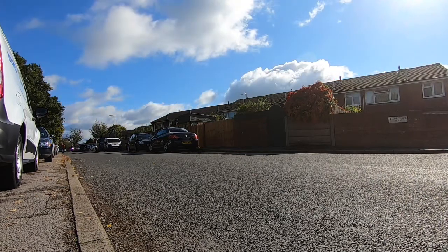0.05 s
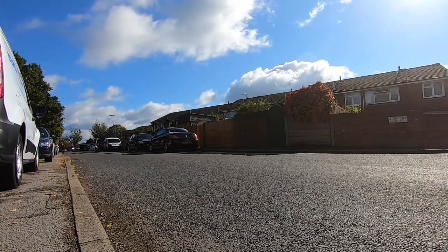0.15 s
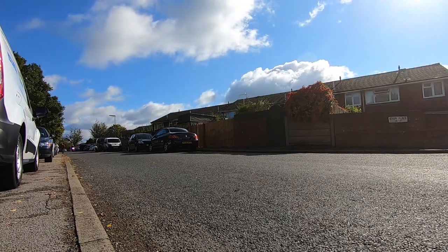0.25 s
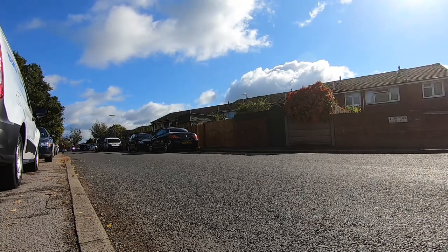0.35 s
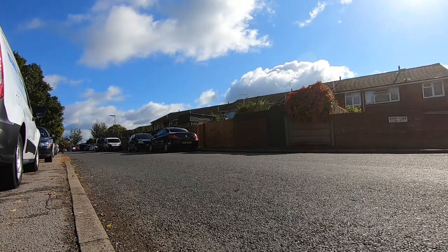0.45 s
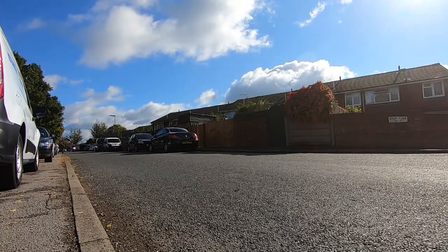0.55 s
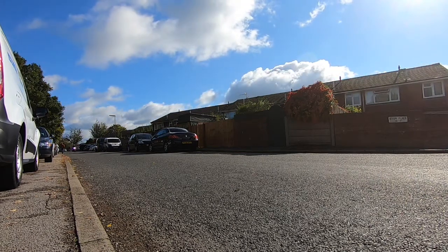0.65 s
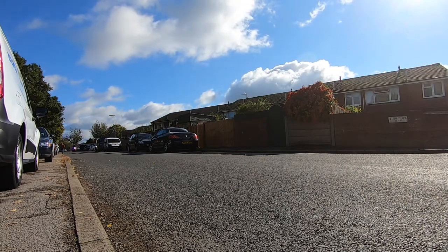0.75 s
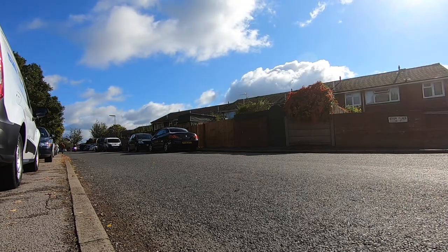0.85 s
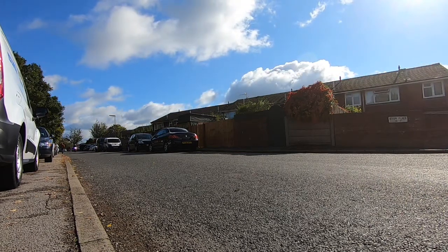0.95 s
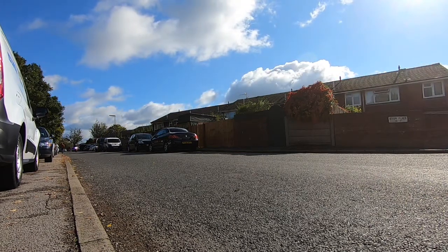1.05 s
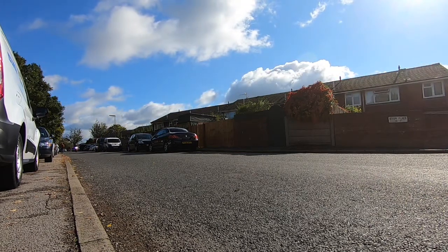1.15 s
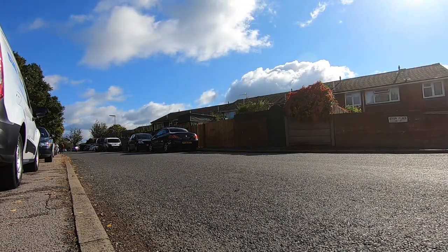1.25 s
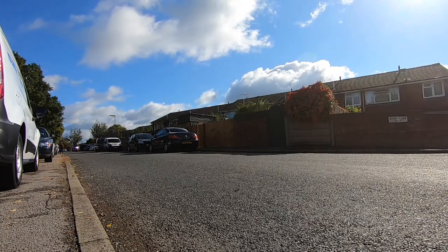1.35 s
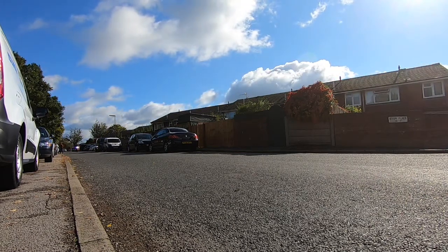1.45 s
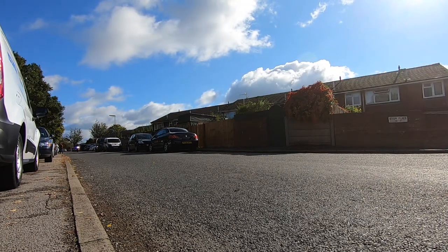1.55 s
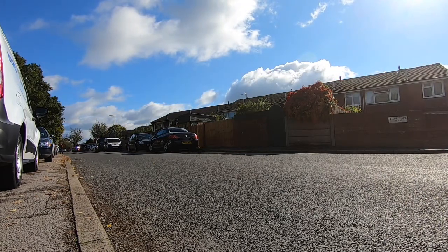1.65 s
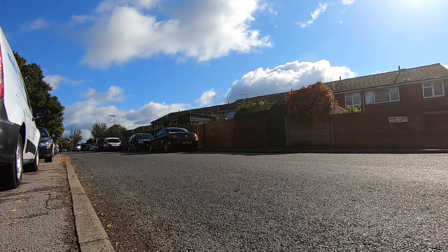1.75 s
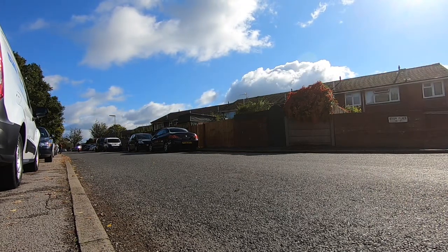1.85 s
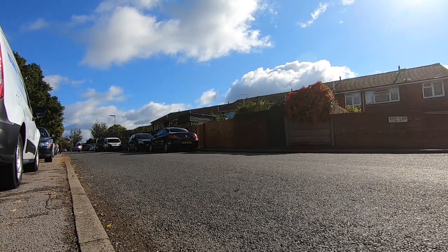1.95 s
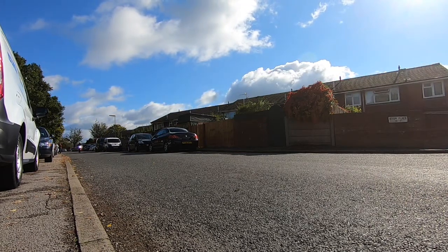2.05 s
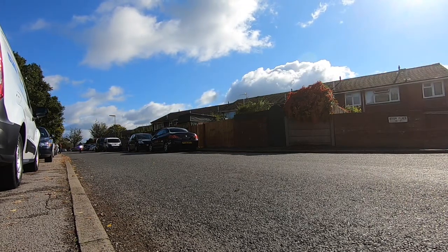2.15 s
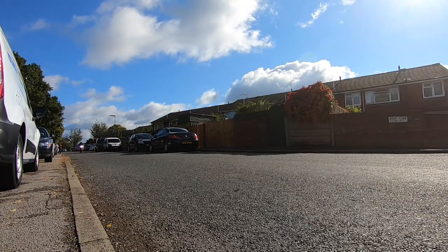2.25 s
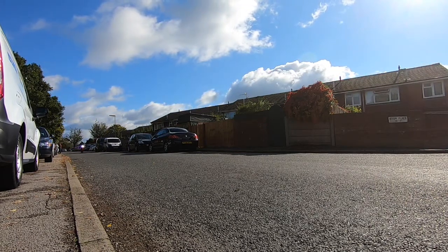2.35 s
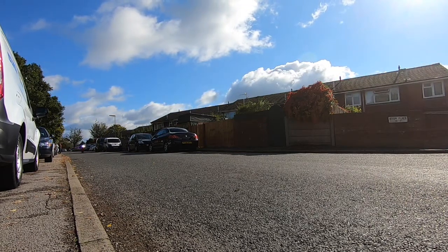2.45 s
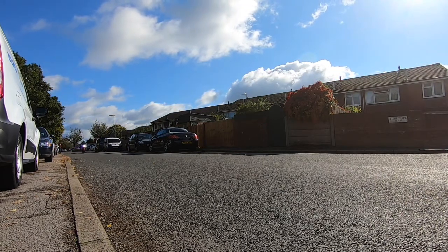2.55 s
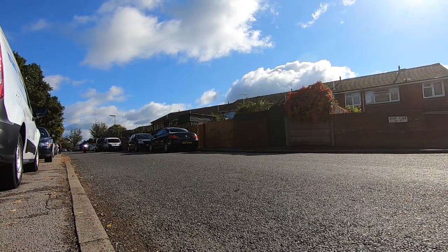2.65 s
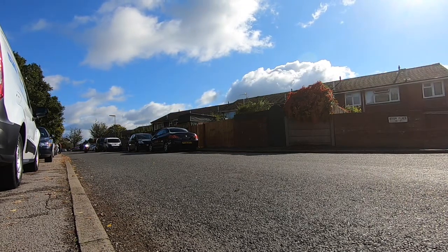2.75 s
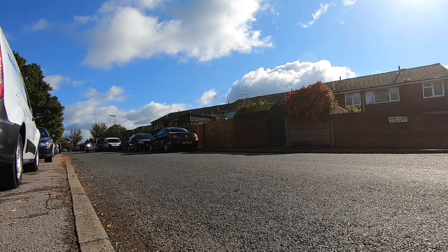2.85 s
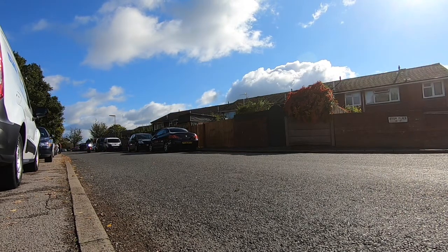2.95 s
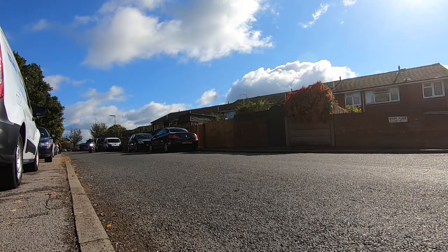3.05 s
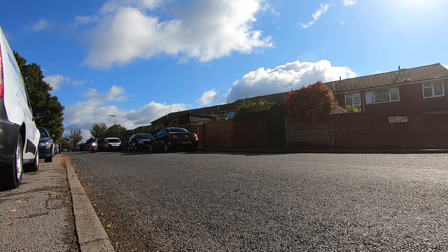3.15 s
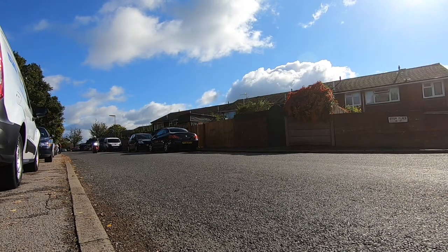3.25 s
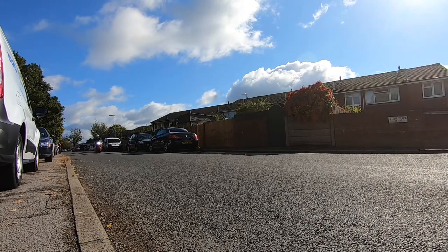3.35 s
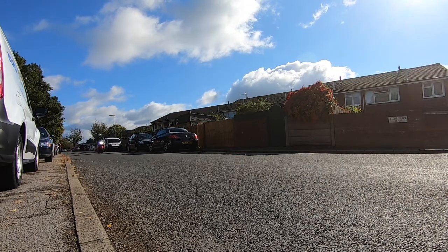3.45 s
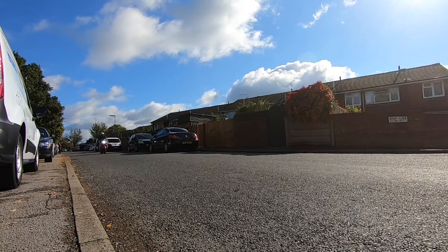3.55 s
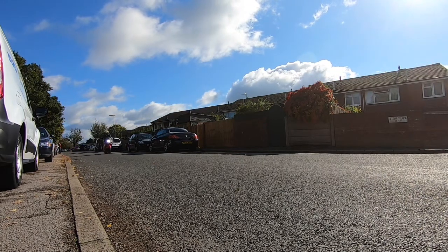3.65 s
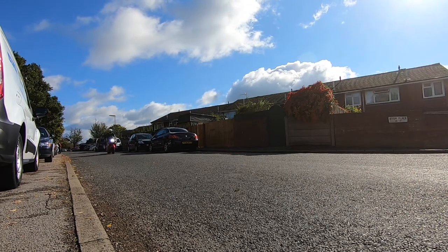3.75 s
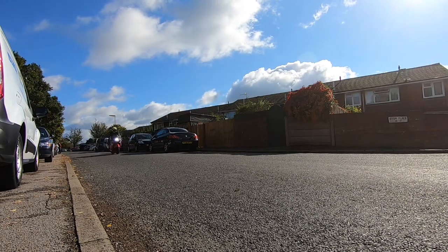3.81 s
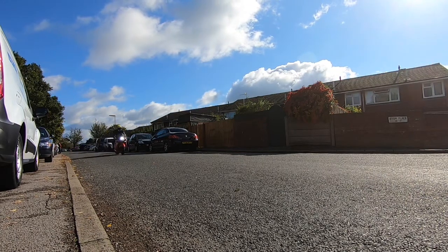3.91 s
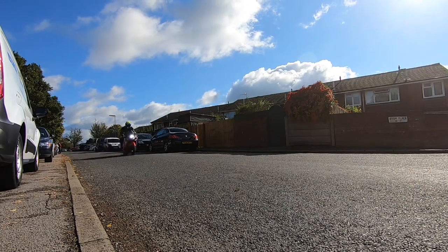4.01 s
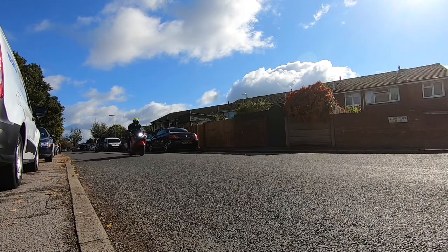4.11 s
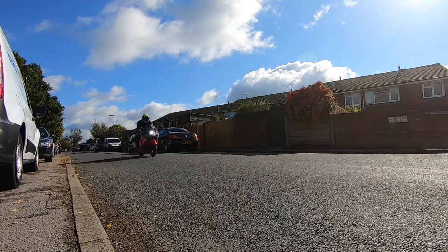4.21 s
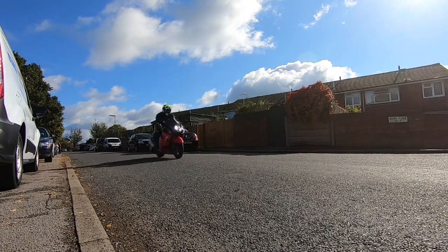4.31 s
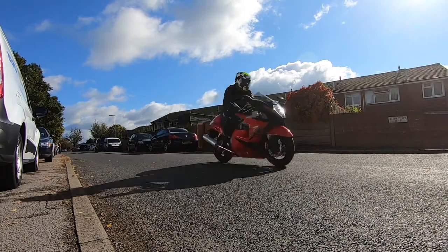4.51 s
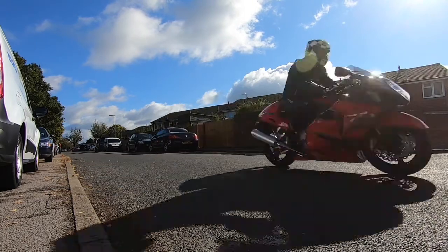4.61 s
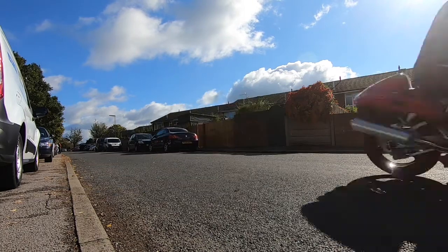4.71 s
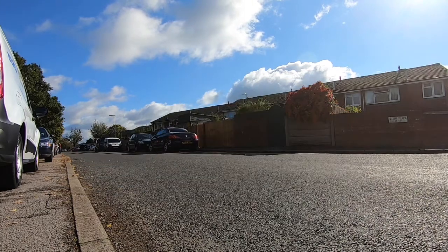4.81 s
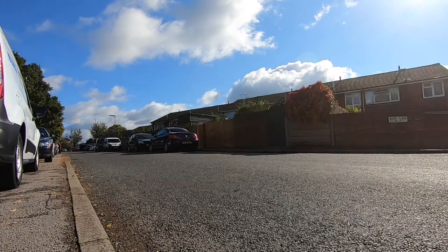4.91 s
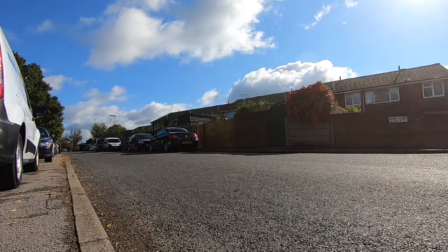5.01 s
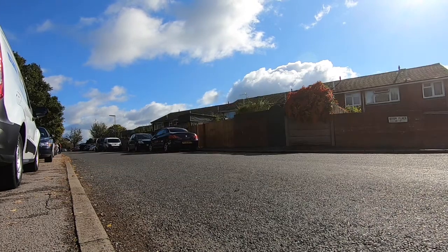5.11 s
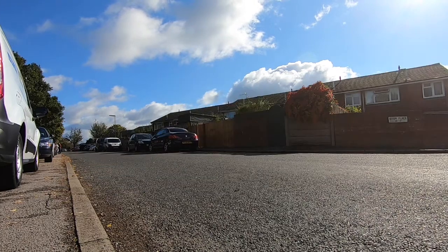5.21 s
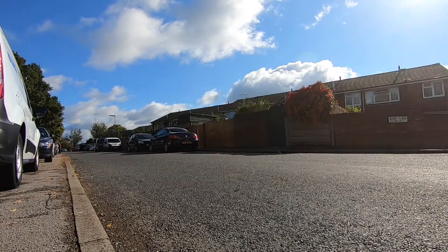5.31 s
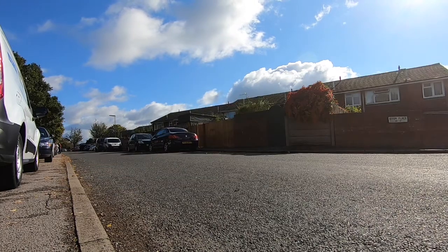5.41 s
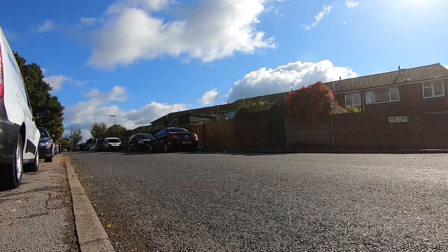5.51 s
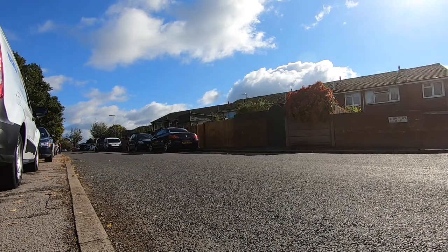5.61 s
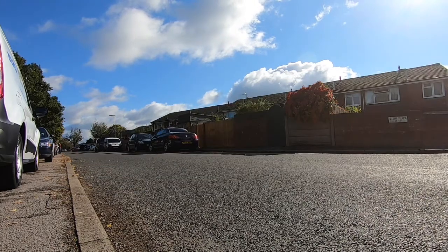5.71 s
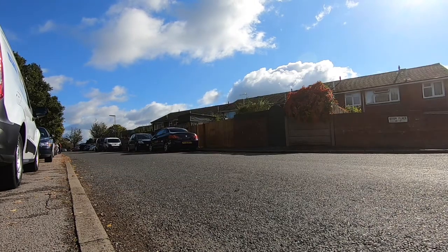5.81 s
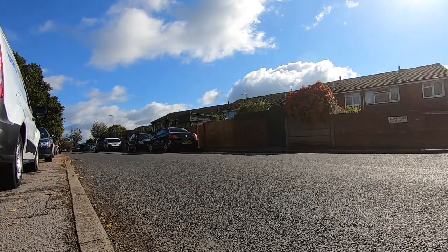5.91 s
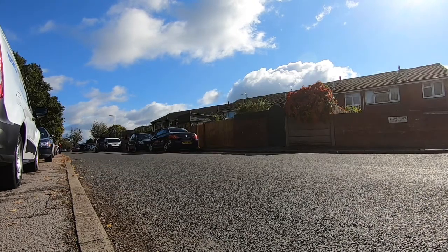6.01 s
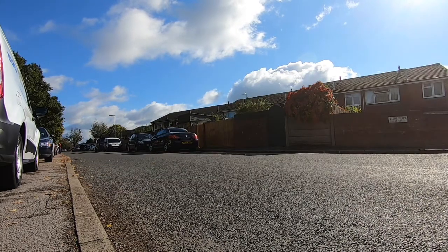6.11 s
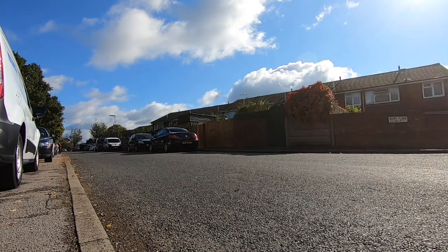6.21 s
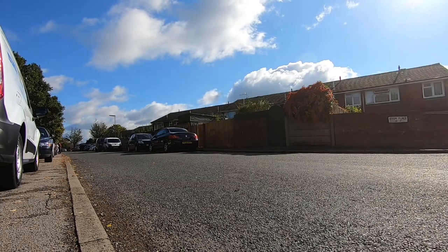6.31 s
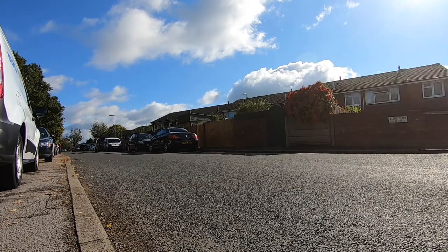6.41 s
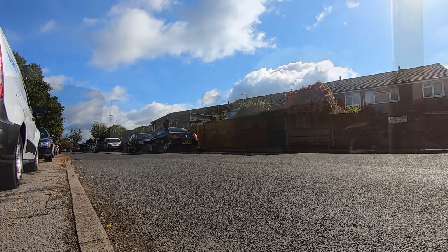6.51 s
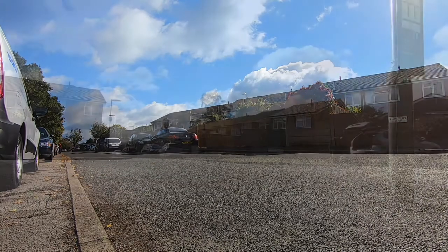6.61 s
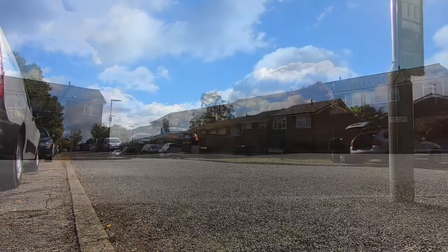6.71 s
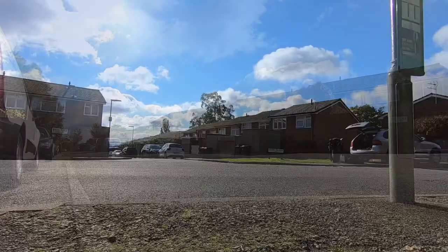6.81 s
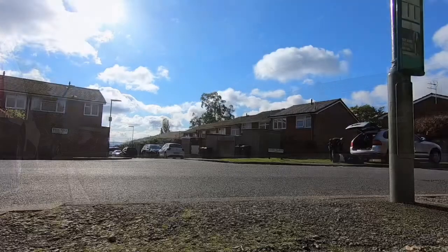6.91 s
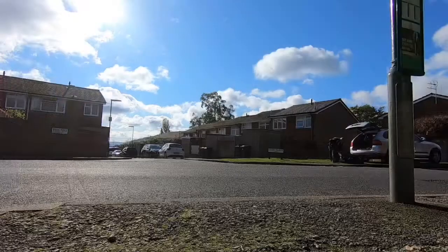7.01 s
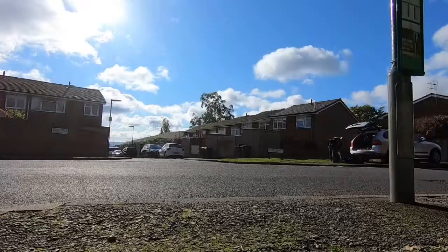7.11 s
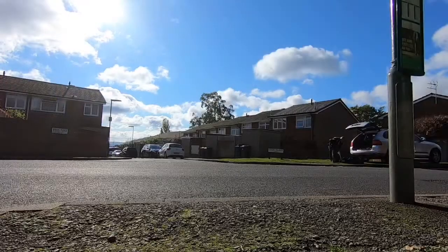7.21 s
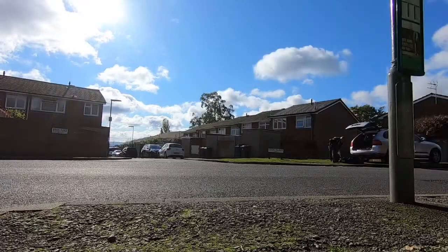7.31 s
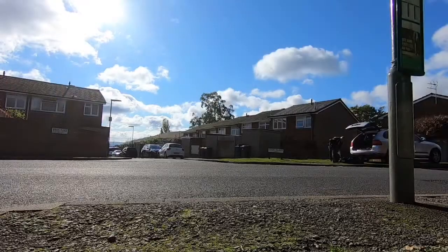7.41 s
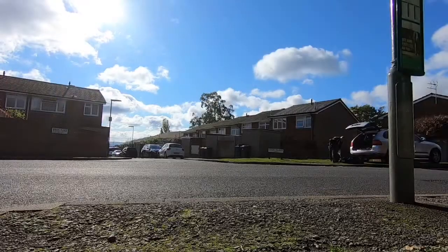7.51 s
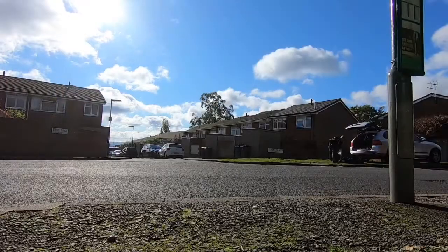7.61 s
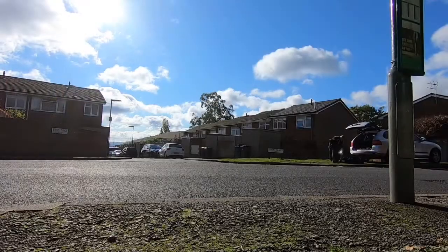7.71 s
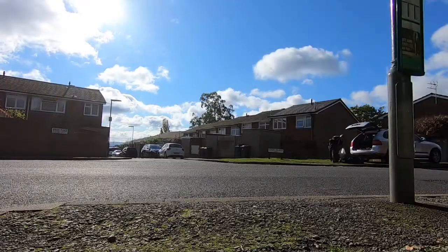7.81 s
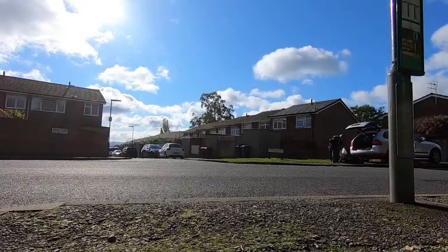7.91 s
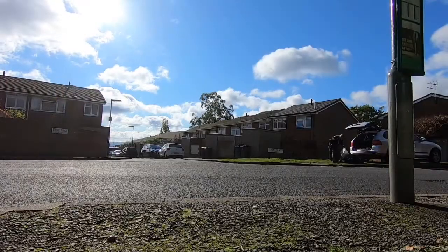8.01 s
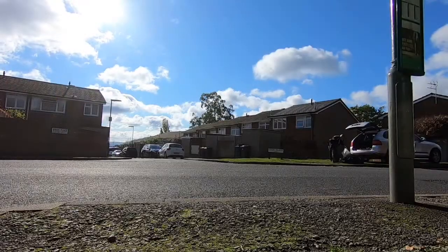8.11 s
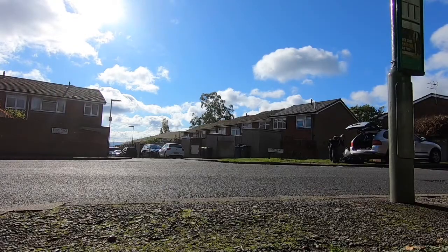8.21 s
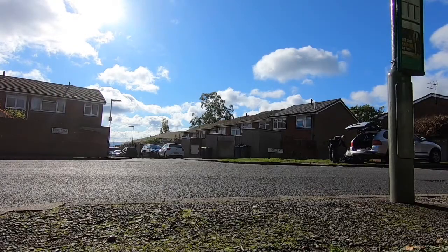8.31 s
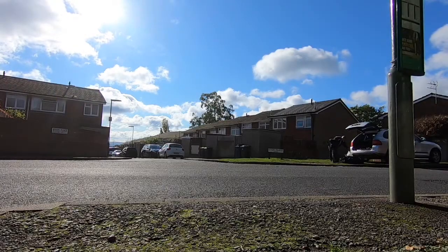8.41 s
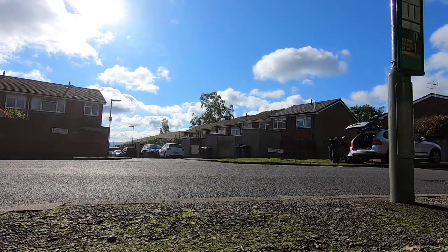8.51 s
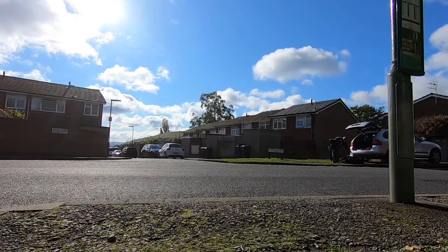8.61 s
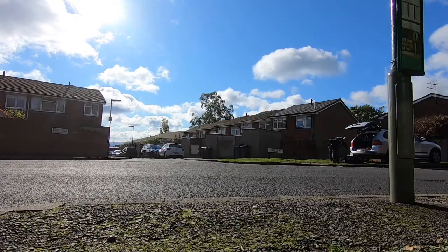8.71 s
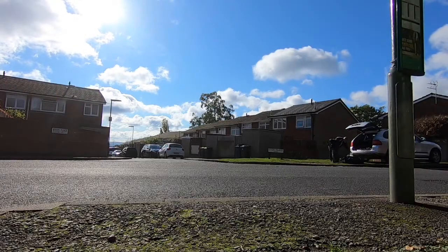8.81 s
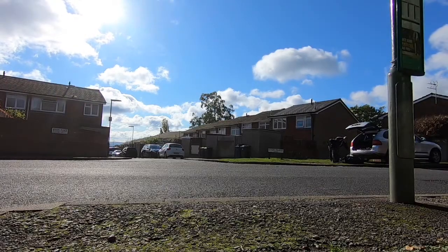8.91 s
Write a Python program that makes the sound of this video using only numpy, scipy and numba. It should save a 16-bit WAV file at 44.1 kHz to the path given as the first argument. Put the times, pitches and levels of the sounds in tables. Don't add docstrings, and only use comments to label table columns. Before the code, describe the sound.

Low roadside stereo microphone outdoors, gusts rumbling on it. A distant motorcycle accelerates for over four seconds, engine note climbing, with whine and gritty roar growing steadily. It passes abruptly close, left to right; the throttle closes, whine vanishes, and the exhaust stutters and sinks in pitch as it leaves. The sound then dissolves into the same machine idling slowly, deep, uneven pulses growing gradually louder toward the right.

```python
import sys
import numpy as np
from scipy import signal
from scipy.fft import irfft
from scipy.io import wavfile
from scipy.ndimage import uniform_filter1d, map_coordinates
from numba import njit

SR = 44100
rng = np.random.default_rng(int(sys.argv[2]) if len(sys.argv) > 2 else 0)


def persist_wave(psi):
    counts = np.round(np.clip(psi, -1, 1) * 32767).astype(np.int16)
    wavfile.write(sys.argv[1], SR, np.atleast_2d(counts).T)


def convert_level_to_amplitude(level_db):
    exponent = np.asarray(level_db, float) / 20
    return 10 ** exponent


N = 394694
TIME = np.arange(N) / SR
FADE_S = 6.77, 6.95

# (time [s], firing rate [Hz])
FIRING_RATE = [(0, 95.5), (1, 102.5), (1.86, 111), (2.5, 119), (3.17, 128.2), (4.2, 142), (4.35, 143.5),
               (4.55, 144), (4.65, 142), (4.74, 134), (4.82, 130), (5.2, 126.5), (5.65, 118), (6, 111.5),
               (6.35, 107), (7, 95)]
# (time [s], level below the closest point [dB])
NEARNESS = [(0, -30), (.72, -26.5), (1.2, -24), (1.74, -19.5), (2.34, -17), (2.9, -13), (3.42, -10),
            (3.75, -6.5), (4.21, -2.5), (4.47, 0.9), (4.69, 0.5), (4.93, -2.5), (5.33, -9), (6, -14.5),
            (6.5, -16), (6.75, -23.5)]
# (time [s], pitch factor [ratio], lead of the left [samples], left minus right [dB])
COURSE = [
    (0, 1.086, 0.46, 3.5),
    (3, 1.08, -0.54, 3.5),
    (4.3, 0.98, 0.39, 0.3),
    (4.55, 1, -0.011, -2),
    (4.72, 1, -1.3, -11),
    (5.1, 0.95, -1.6, -6),
    (6.4, 0.942, -1.3, -9),
    (6.9, .96, -1.3, -5),
    (8.95, 1, -0.77, -8),
]
# (time [s], level [dB])
EXHAUST_BEAT = [(0, -39.5), (1, -35.5), (1.4, -37.5), (1.65, -32), (2.2, -27.5), (2.8, -23), (3.2, -20),
                (3.8, -19), (4.2, -15), (4.6, -14.5), (4.8, -18.5), (5.2, -14.5), (5.5, -24.5), (6, -23),
                (6.3, -25), (6.5, -36.5), (6.8, -33.5), (7, -43)]
# (time [s], depth [dB], half width [s])
BEAT_NULLS = [(.2, 0.5, 0.098), (.8, -12, 0.069), (1.23, -11, 0.12), (1.92, -9, 0.14), (2.4, -10, 0.097),
              (2.6, -5.5, 0.11), (2.88, -6.5, 0.067), (3.08, -4, 0.053), (3.48, -17, 0.037),
              (3.58, -11, 0.038), (3.68, -11, 0.028), (3.95, -5, 0.043), (4.08, -7.5, 0.064),
              (4.3, -11, 0.046), (4.43, -13, 0.042), (4.53, -6.5, 0.03), (4.69, -7.5, 0.052),
              (5.58, -5, 0.041), (6.19, -17, 0.058)]
# (time [s], depth [dB], half width [s])
OCTAVE_NULLS = [(.17, -17, 0.078), (.7, -1, .1), (1.2, 2.5, 0.33), (2.2, -15, 0.23), (2.55, -3, .15),
                (3.0, -4, 0.19), (3.27, -14, .1), (3.62, -12, 0.18), (4.15, -3.5, .1), (5.1, -5.5, 0.079),
                (5.3, -9, 0.073), (6.2, -4.5, 0.068), (6.75, -14, 0.13)]
# (time [s], depth [dB], half width [s])
WHINE_NULLS = [
    (.05, -9, .1),
    (.4, 3.5, 0.2),
    (1.2, -6.5, 0.33),
    (1.7, -1, 0.081),
    (2.5, -5, 0.64),
    (3.25, -4, 0.15),
    (3.6, -4, .06),
    (3.95, -3.5, 0.2),
    (4.8, -14, 0.051),
]
# (time [s], that firing [dB], the next firing
# [dB])
MISFIRES = [(4.657, -6, -6), (4.674, -16, -5), (4.697, 9, 8), (4.726, -20, 10.5), (4.762, -23, 1.5),
            (4.778, -11, -3), (4.792, 8, 3), (4.809, -28, 7.5), (4.84, -16, 4), (4.864, -1, 4),
            (4.896, -2, 4), (4.934, -3, 5.5), (4.996, -34, 1), (5.216, -13, -1), (5.232, -4, -3),
            (6.214, -12, -7), (6.285, -18, -12), (6.316, -4, 5.5), (6.404, -19, -15)]
# (multiple of firing rate [ratio], level over the roar [dB], from [s], until [s])
CASING_ORDERS = [(.5, -13, 3.5, 6), (1.5, -4, 1.5, 2.6), (1.5, -9, 3, 4.4), (2.5, -7, 1.8, 4.7),
                 (2.75, -6, 6, 6.9), (3, -6, 0, 3.4), (3, -11, 3.6, 4.6), (3, -6, 4.8, 6),
                 (3.5, -12, 2.2, 3.2), (4, -14, 3.8, 4.7), (4.5, -13, 2.5, 5.6), (5, -8, 1.8, 3.4),
                 (5, -12, 3.6, 4.2), (5, -4, 4.3, 4.5), (5.5, -7, 4.25, 4.6), (6, -10, 4.42, 4.55),
                 (8.25, -5, 0, .25), (11, -8, 1.1, 2.2), (10, -13, 2.6, 3.2)]
# (multiple of firing rate [ratio], level over the whine [dB], from [s], until [s])
WHINE_SIDES = [
    (25, -3, 0, 1.1),
    (27, 0, 4.28, 4.6),
    (25.8, -1, 4.58, 4.68),
    (28, -10, 3.2, 4.1),
]
# (low edge [Hz], high edge [Hz])
ROAR_BANDS = [
    (160, 400),
    (400, 1500),
    (1500, 4500),
    (5000, 11000),
]
# (closest [dB], slope [dB per dB of nearness], gain from behind [dB], idle far [dB], idle near [dB])
LAYERS = [
    (-32.5, 0.88, -2.5, -52.5, -42.5),
    (-28, 0.9776, -0.5, -48, -44.5),
    (-27, 1.0656, -5, -55.5, -52.5),
    (-44, 1.34, 2.5, -75.5, -65.5),
]
# (time [s], gain [dB], half width [s])
CLATTER_SWELLS = [(.9, -0.5, 0.34), (2.55, 3.5, 0.43), (4.47, 2, 0.17), (6.12, 3.5, 0.093), (7.15, 2, .35),
                  (8.9, 2.5, 0.25)]
# (frequency [Hz], density [dB per Hz])
PASS_COLOUR = [(40, -24.5), (70, -5), (130, -4), (240, -8), (470, -14), (600, -12), (870, -17.5),
               (2400, -28.5), (3900, -42.5), (5600, -55), (8000, -67.5), (11000, -77.5), (14500, -85.5)]
# (frequency [Hz], density [dB per Hz])
IDLE_COLOUR = [(40, 9), (130, -1.5), (220, -12), (840, -21), (990, -24.5), (1300, -28), (2300, -35),
               (4500, -46.5), (9800, -52.5), (14500, -62)]
# (frequency [Hz], side minus mid [dB])
DIFFUSE = [(60, -15.5), (130, -37), (280, -50), (620, -10), (1200, -2.5), (2500, -11), (4200, -13.5),
           (7500, 4), (13000, -4)]
# (frequency [Hz], width [Hz], level over its roar band [dB], from [s], until
# [s])
HOLLOW_PARTS = [(606, 120, -3, 2.48, 4.45), (1165, 110, -5.5, 2.44, 4.3), (280, 75, 5.5, 4.79, 4.87),
                (600, 42, -4, 4.85, 6.45), (1180, 42, -7.5, 4.9, 6), (1010, 35, -9, 7.2, 9),
                (340, 25, -9, 7.3, 8.6), (2320, 160, -12, 2.7, 2.4), (5050, 300, 0, .3, 2.8),
                (7800, 900, -8.5, 4.5, 8.3), (10080, 1200, -9.5, 4.09, 11), (13600, 1900, -20, 4.2, 8.2)]
# (time [s], peak [dB], half width [s])
GUSTS = [(0, -34.5, 0.17), (.42, -37, 0.21), (.82, -36, .13), (1.35, -40, 0.091), (1.8, -42, 0.074),
         (2.2, -47, 0.17), (3.68, -45, .12), (5.4, -49, .2), (6.05, -40, .08), (6.28, -29.5, 0.14),
         (6.6, -32.5, 0.087), (7.38, -43, .08), (7.75, -47, 0.12), (8.1, -48, 0.069), (8.42, -35, .1),
         (8.9, -44, 0.068)]
# (first [s], last [s], first level [dB], last level [dB], stumble change [dB])
IDLE_RUNS = [(6.71, 6.81, -26, -29, -6), (6.846, 6.97, -22, -22, -4), (7.047, 7.306, -24, -22, -8),
             (7.365, 7.518, -20, -21, -5), (7.576, 7.627, -19, -18.5, -10), (7.677, 7.726, -17, -18.5, -8),
             (7.784, 7.921, -19, -16.5, -6), (8.003, 8.056, -16, -18, -10), (8.111, 8.16, -19, -17, -7),
             (8.22, 8.351, -16, -17, -5), (8.402, 8.455, -15.5, -15.5, -13), (8.545, 8.679, -17, -15.5, -8),
             (8.762, 8.891, -15.5, -13.5, -9)]
# (frequency [Hz], width [Hz], level [dB])
SILENCER = [
    (77.4, 33, 3.5),
    (37.4, 28, -1.5),
    (117, 100, -23),
    (171, 35, -7),
]


def curves(table):
    s, *columns = np.transpose(table)
    return [np.interp(TIME, s, c) for c in columns]


def bumps(rows):
    return sum(height * np.exp(-((TIME - s) / width) ** 2) for s, height, width in rows)


def window(start, stop, edge=.12):
    return np.clip(np.minimum(TIME - start, stop - TIME) / edge + 1, 0, 1)


def walk(rate):
    hold = int(SR / rate)
    steps = np.repeat(rng.standard_normal(N // hold + 1), hold)
    return 1.3 * uniform_filter1d(uniform_filter1d(steps, hold), hold)[:N]


def unit(x):
    return x / np.sqrt(np.mean(x ** 2))


def colour_db(table, hz):
    table_hz, db = np.transpose(table)
    return np.interp(np.log(hz), np.log(table_hz), db)


@njit
def svf(x, hz, width):
    y, b, l = np.empty(len(x)), 0., 0.
    for i in range(len(x)):
        g, k = np.tan(np.pi * hz[i] / SR), width / hz[i]
        v = (b + g * (x[i] - l)) / (1 + g * (g + k))
        b, l, y[i] = 2 * v - b, l + 2 * g * v, k * v
    return y


def resonate(x, hz, width):
    return svf(svf(x, hz, width), hz, width)


def by_distance(db, slope, behind_db):
    return db + slope * curves(NEARNESS)[0] + behind_db * np.interp(TIME, (4.61, 4.85), (0, 1))


def passing_engine(cycles, roar_db):
    flutter_db = -0.1 * curves(NEARNESS)[0] * walk(11)
    beat_db = curves(EXHAUST_BEAT)[0] + bumps(BEAT_NULLS) + flutter_db
    octave_db = by_distance(-28.5, 0.61, 0.43) + bumps(OCTAVE_NULLS)
    whine_db = by_distance(-36.5, 1, -14) + bumps(WHINE_NULLS)

    size_db = 0.15 * rng.standard_normal(int(cycles[-1]) + 2)
    for s, weak_db, next_db in MISFIRES:
        k = int(cycles[int(s * SR)])
        size_db[k:k + 2] += weak_db, next_db
    size = convert_level_to_amplitude(size_db)[cycles.astype(int)]
    angle = 2 * np.pi * cycles
    no_flow = signal.butter(2, 72., "high", fs=SR, output="sos")
    puffs = signal.sosfilt(no_flow, size * (1 - np.cos(angle)))
    out = convert_level_to_amplitude(beat_db) * puffs
    out += convert_level_to_amplitude(octave_db - 3.5) * np.sin(2 * angle + 0.17 * walk(18))

    for multiple, db, start, stop in CASING_ORDERS:
        level = window(start, stop) * convert_level_to_amplitude(roar_db + db + 3 * walk(14))
        out += level * np.sin(multiple * angle + 1.2 * walk(14))
    for multiple, db, start, stop in [(25.9, 0.0091, 0.0099, 5.4), *WHINE_SIDES]:
        level = window(start, stop, edge=.06) * convert_level_to_amplitude(whine_db + db - 1 + 3 * walk(30))
        out += level * np.sin(multiple * angle + 1.6 * walk(25))
    mesh_hz = 26.15 * np.gradient(cycles) * SR
    mesh_noise = unit(resonate(rng.standard_normal(N), mesh_hz, 420.))
    out += window(0, 4.66, edge=.1) * convert_level_to_amplitude(uniform_filter1d(whine_db, SR // 4) - 1) * mesh_noise
    return np.sqrt(2) * out * np.interp(TIME, FADE_S, (1, 0)) ** 0.27


def layer_levels():
    later = np.interp(TIME, (FADE_S[0] - .1, FADE_S[1]), (0, 1))
    dbs = [by_distance(*row[:3]) for row in LAYERS]
    dbs[0] = 10 * np.log10(convert_level_to_amplitude(2 * dbs[0]) + convert_level_to_amplitude(2 * -45.5))
    dbs[1] = dbs[1] + 3 * window(6.3, 6.45)
    for k, row in enumerate(LAYERS):
        idle_db = np.interp(TIME, (FADE_S[1], TIME[-1]), row[3:])
        dbs[k] = dbs[k] + later * (idle_db - dbs[k])
    dbs[2] = dbs[2] + bumps(CLATTER_SWELLS)
    return dbs


def noise_band(hz):
    bins = np.zeros(N // 2 + 1, complex)
    a, b = int(hz * 2 ** (-1 / 3) * N / SR), int(hz * 2 ** (1 / 3) * N / SR)
    noise = rng.standard_normal(b - a) + 1j * rng.standard_normal(b - a)
    bins[a:b] = noise * np.sin(np.linspace(0, np.pi, b - a))
    return unit(irfft(bins, N))


def roar(band_dbs, throb, doppler):
    centres = 45 * 2 ** np.arange(0, 8.4, 1 / 3)
    middles = np.log([np.sqrt(lo * hi) for lo, hi in ROAR_BANDS])
    shape = []
    for colour in (PASS_COLOUR, IDLE_COLOUR):
        db = colour_db(colour, centres) + 10 * np.log10(centres)
        sums = []
        for lo, hi in ROAR_BANDS:
            inside = (centres > lo) & (centres < hi)
            sums.append(10 * np.log10(np.sum(convert_level_to_amplitude(2 * db[inside]))))
        shape.append((db, sums))

    later = np.interp(TIME, FADE_S, (0, 1))
    direct, diffuse, swell = 0, 0, walk(2.566)
    for k, hz in enumerate(centres):
        share = [np.interp(np.log(hz), middles, row) for row in np.eye(4)]
        early_db, late_db = (db[k] - np.dot(share, sums) for db, sums in shape)
        level_db = sum(w * c for w, c in zip(share, band_dbs))
        level_db = level_db + early_db + later * (late_db - early_db)
        gain = convert_level_to_amplitude(level_db + .5 * swell + 0.51 * walk(12)) * (1 + min(hz / 4000.0, 1) * throb)
        direct = direct + gain * noise_band(hz)
        diffuse = diffuse + gain * convert_level_to_amplitude(colour_db(DIFFUSE, hz)) * noise_band(hz)
    return direct + hollow_parts(band_dbs, middles, doppler), diffuse


def hollow_parts(band_dbs, middles, doppler):
    out = np.zeros(N)
    for hz, width, db, start, stop in HOLLOW_PARTS:
        band_db = band_dbs[np.argmin(abs(middles - np.log(hz)))]
        ring = unit(resonate(rng.standard_normal(N), hz * doppler, 2. * width))
        level = convert_level_to_amplitude(band_db + db + (1 + 60 / width) * walk(16))
        out += level * window(start, stop, edge=.2) * ring
    return out


def wind():
    sos = signal.butter(2, [18., 75.], "band", fs=SR, output="sos")
    left, right, both, town = (unit(signal.sosfilt(sos, rng.standard_normal(N))) * convert_level_to_amplitude(2.0 * walk(14))
                               for _ in range(4))
    strength = convert_level_to_amplitude(-53.5) + bumps([(s, convert_level_to_amplitude(db), width) for s, db, width in GUSTS])
    return (np.array([left, right]) + 0.32 * both) * strength + convert_level_to_amplitude(-47.5) * town


def idling_engine():
    even_hz, stumble_hz = 38.5, 34
    times, dbs = [], []
    for run, (again, *_) in zip(IDLE_RUNS, [*IDLE_RUNS[1:], (8.97,)]):
        first, last, first_db, last_db, soft_db = run
        even = round((last - first) * even_hz) + 1
        slow = max(round((again - last) * stumble_hz), 2)
        times += list(np.linspace(first, last, even))
        times += list(np.linspace(last, again, slow + 1)[1:-1])
        dbs += list(np.linspace(first_db, last_db, even))
        dbs += [last_db + soft_db] * (slow - 1)

    jitter, unevenness = rng.standard_normal((2, len(times)))
    at = ((np.array(times) - .003 + 0.00057 * jitter) * SR).astype(int)
    pulses = np.zeros(N + SR)
    pulses[at] = convert_level_to_amplitude(np.array(dbs) + 0.85 * unevenness)
    pulses[at + int(.0135 * SR)] = convert_level_to_amplitude(np.array(dbs) - 11.5)
    pulses = uniform_filter1d(pulses[:N], int(0.0047 * SR))
    ring = sum(convert_level_to_amplitude(db) * resonate(pulses, np.full(N, 1. * hz), 2. * width) for hz, width, db in SILENCER)
    throb = unit(uniform_filter1d(pulses, int(0.013 * SR)))
    return convert_level_to_amplitude(48.5) * ring, throb


def scene():
    band_dbs = layer_levels()
    doppler, lead, pan_db = curves(COURSE)
    cycles = np.cumsum(uniform_filter1d(curves(FIRING_RATE)[0], 2500)) / SR
    idle, idle_throb = idling_engine()
    throb = 0.066 * np.cos(2 * np.pi * cycles) * (TIME < FADE_S[1]) + 0.068 * (idle_throb - .3)
    direct, diffuse = roar(band_dbs, throb, doppler)
    mid = direct + idle + passing_engine(cycles, band_dbs[1])
    ports = np.array([map_coordinates(mid, [np.arange(N) + sign * lead / 2], order=5) + sign * diffuse
                      for sign in (1, -1)])
    echo_band = signal.butter(1, [600., 1800.], "band", fs=SR, output="sos")
    echo = np.roll(signal.sosfilt(echo_band, mid), int(0.00115 * SR))
    ports[0] -= 0.38 * window(4.7, 8.2) * echo
    shaded_band = signal.butter(2, [330., 11000.], "band", fs=SR, output="sos")
    shade = convert_level_to_amplitude(np.array([pan_db, -pan_db]) / 2) - 1
    return ports + signal.sosfilt(shaded_band, ports) * shade + wind()


def low_pass(x):
    return signal.sosfilt(signal.butter(12, 14460, fs=SR, output="sos"), x)


def record(dry):
    return low_pass(dry)


dry = scene()
out = record(dry)
persist_wave(out)
```